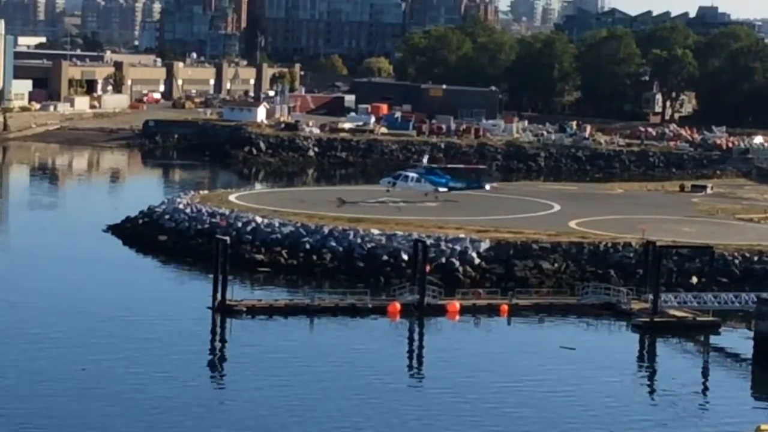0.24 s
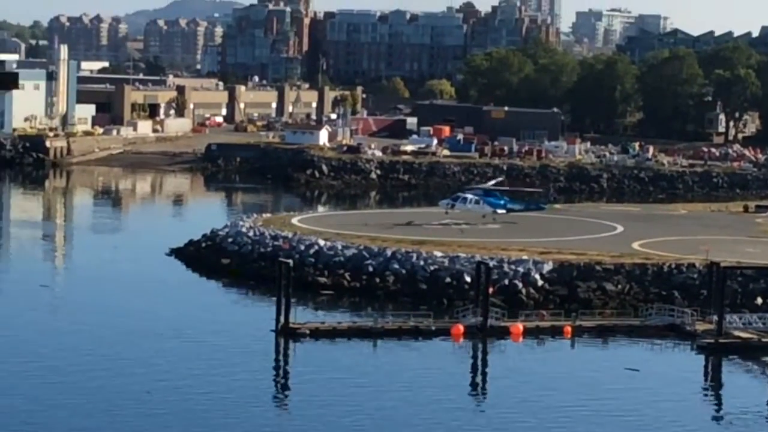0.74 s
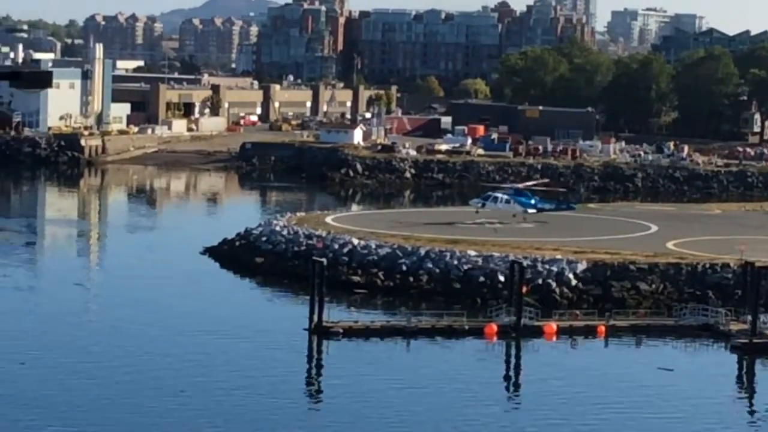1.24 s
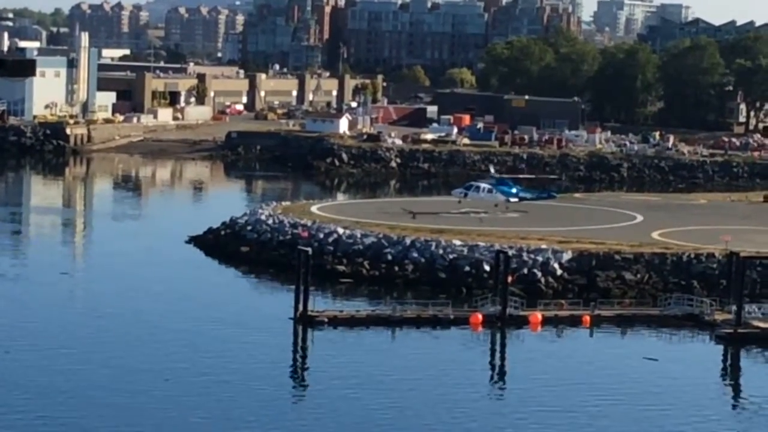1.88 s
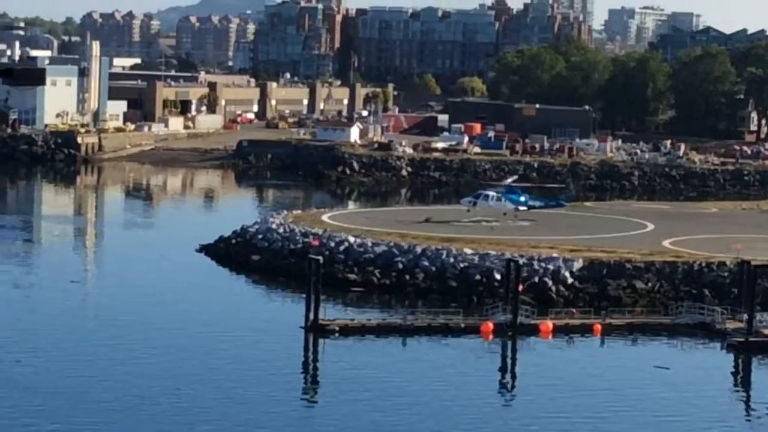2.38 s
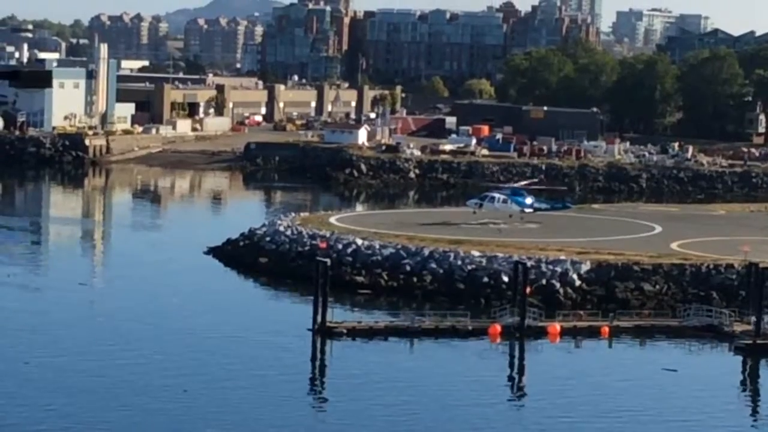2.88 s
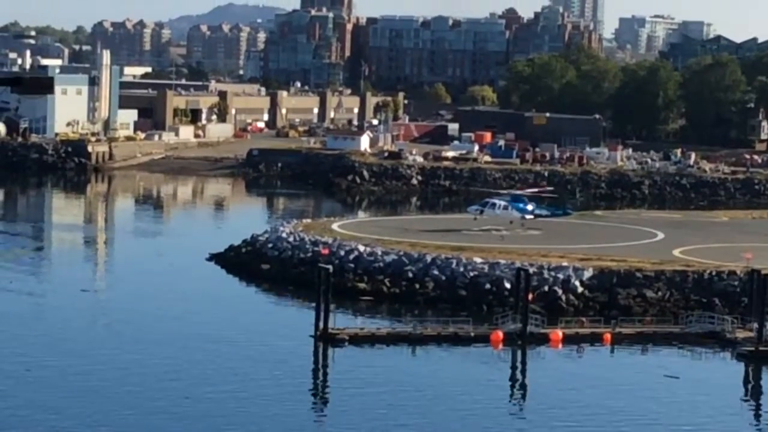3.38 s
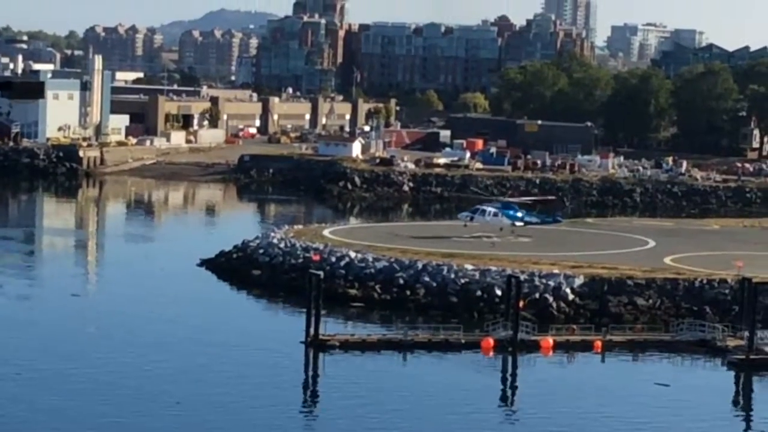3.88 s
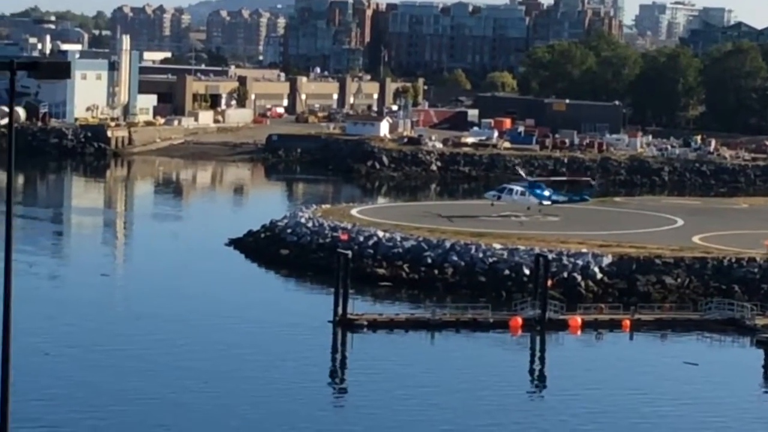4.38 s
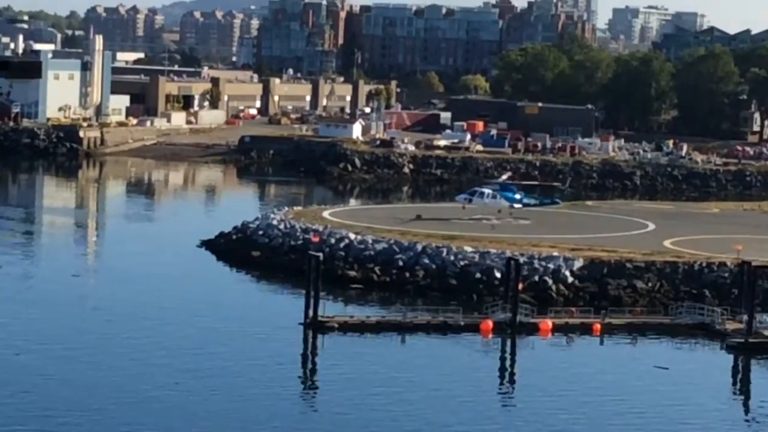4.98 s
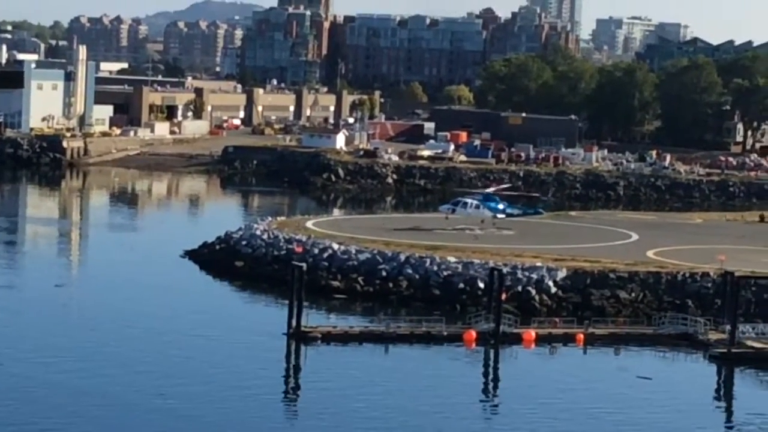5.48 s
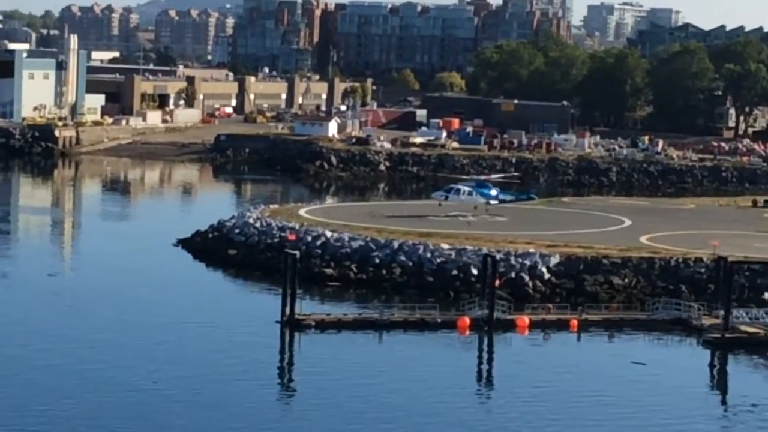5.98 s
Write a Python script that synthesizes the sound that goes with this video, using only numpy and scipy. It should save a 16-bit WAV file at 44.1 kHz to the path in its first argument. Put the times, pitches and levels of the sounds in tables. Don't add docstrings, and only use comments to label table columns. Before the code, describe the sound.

Across open water, a waiting helicopter drones steadily: a deep two-note hum, muffled rushing roar, and uneven rapid chopping that slowly recedes.

```python
import sys
import numpy as np
from scipy import signal
from scipy.fft import rfft, irfft
from scipy.io import wavfile
from scipy.ndimage import uniform_filter1d

SR = 44100
rng = np.random.default_rng(int(sys.argv[2]) if len(sys.argv) > 2 else 0)


def field_ratio(decibels):
    return 10 ** (np.asarray(decibels, dtype=float) / 20)


def wav_record(signal):
    frames = np.transpose(np.atleast_2d(signal))
    bounded = np.clip(frames, -1, 1)
    quanta = np.round(bounded * 32767).astype(np.int16)
    wavfile.write(sys.argv[1], SR, quanta)


N = 275625
T = np.arange(N) / SR
ROTOR_HZ = 4.898
TAIL_GEAR = 22


def rms_one(x):
    return x / np.sqrt(np.mean(x ** 2) + 1e-20)


def curve(rows):
    seconds, values = np.transpose(rows)
    return np.interp(T, seconds, values)


def coloured(x, spectrum):
    hz, level_db = np.transpose(spectrum)
    bin_hz = np.maximum(np.arange(N // 2 + 1) * SR / N, 1)
    gain_db = np.interp(np.log(bin_hz), np.log(hz), level_db)
    return irfft(rfft(x) * field_ratio(gain_db), N)


def drift(rate):
    step, settle = 40, 2000
    pole = np.exp(-2 * step * np.pi * rate / SR)
    noise = rng.standard_normal(N // step + settle + 2)
    slow = signal.lfilter([1], [1, -2 * pole, pole * pole], noise)[settle:]
    return np.interp(np.arange(N) / step, np.arange(len(slow)), rms_one(slow))


def bell(x, hz, width_hz, gain_db):
    w, a = 2 * np.pi * hz / SR, field_ratio(gain_db / 2)
    k = np.sin(w) * width_hz / hz / 2
    above = [1 + k * a, -2 * np.cos(w), 1 - k * a]
    below = [1 + k / a, -2 * np.cos(w), 1 - k / a]
    return signal.lfilter(above, below, x)


def swells_db(rows, floor_db, order):
    level = field_ratio(floor_db)
    for s, level_db, half_s in rows:
        level = level + field_ratio(level_db) * np.exp(-np.abs((T - s) / half_s) ** order)
    return 20 * np.log10(level)


def tail_rotor():
    # time in seconds, level in dB.
    hum_level = [(0, -38), (.06, -35.5), (.5, -36.5), (.85, -41.5), (1.4, -39.5), (2.0, -38.5),
                 (2.9, -41.5), (3.9, -41), (4.45, -41), (4.8, -43), (5.45, -42), (5.7, -46.5),
                 (6.05, -42.5), (6.25, -44.5)]
    # centre in seconds, level in dB, half length in seconds.
    upper_swells = [(0.25, -32, 0.18), (0.58, -38, 0.11), (0.77, -36, 0.044), (0.94, -39, 0.047),
                    (1.45, -40, 0.17), (1.73, -41.5, 0.058), (1.93, -42, 0.055), (2.17, -41, 0.081),
                    (2.29, -45.5, 0.036), (2.65, -38.0, 0.17), (2.94, -46.0, 0.044), (3.14, -41, 0.2),
                    (3.56, -39.5, 0.189), (3.98, -35.5, 0.094), (4.27, -38, 0.16), (4.65, -42, 0.16),
                    (4.9, -39.5, 0.097), (5.1, -40, 0.044), (5.26, -38.5, 0.096), (5.61, -47.5, 0.087),
                    (5.77, -39.5, 0.07), (6.01, -50, 0.067), (6.22, -44.5, 0.086)]
    first_db = curve(hum_level)
    second_db = swells_db(upper_swells, floor_db=-54.5, order=3)
    turn = 2 * np.pi * ROTOR_HZ * TAIL_GEAR * T
    sway = turn + 0.093 * drift(2.2)

    beat_peak = .423
    beat_phase = sway + 2 * np.pi * (ROTOR_HZ * T - beat_peak)
    first = np.cos(sway) + field_ratio(-15 + 1.5 * drift(.8)) * np.cos(beat_phase)

    sharp_hz = .14 * (second_db - uniform_filter1d(second_db, size=SR // 2))
    lead = signal.lfilter([2 * np.pi / SR], [1, -np.exp(-3 / SR)], sharp_hz)
    second = np.cos(2 * turn - .5 + lead + .3 * drift(1.2))
    return -np.sqrt(2) * (field_ratio(first_db) * first + field_ratio(second_db) * second)


def main_rotor_tones():
    # multiple of the rotor turn, level in dB.
    main_orders = [(32, -70), (48, -57), (56, -61)]
    tones = 0
    for order, level_db in main_orders:
        fade = field_ratio(level_db + 2.2 * drift(1.3))
        tones = tones + fade * np.sin(2 * np.pi * ROTOR_HZ * order * T + drift(0.9))
    return tones


def blade_lift_db():
    # part of a turn, lift in dB.
    blades = [(.04, 2.4), (.28, 1.9), (.57, 4.8), (.78, 3.0)]
    # time in seconds, lift in dB, decay in seconds.
    slaps = [(0.095, 0.5, .02), (.308, 2, .02), (.479, 1.5, .02), (0.574, 0.5, 0.022), (1.126, 5, 0.017),
             (1.211, 3, 0.048), (1.546, 5, 0.036), (2.055, 2.5, .015), (2.179, 2, 0.035), (2.356, 8, 0.027),
             (2.388, 3, 0.011), (2.53, 4.5, 0.022), (2.756, 1, .02), (2.856, 7.5, 0.019),
             (3.17, 3.5, 0.035), (3.261, 1, .02), (3.386, 3.5, .03), (3.575, 1, .04), (3.789, 3, .03),
             (4.391, 5, 0.08), (4.59, 5, .02), (4.751, 8, .015), (4.797, 6, .015), (4.85, 6.5, 0.017),
             (5.202, 3, 0.017), (5.421, 5.5, 0.042), (5.639, 5.5, 0.012), (5.832, 3, 0.013)]
    pass_width = .054
    lift = 0
    for part, lift_db in blades:
        away = (ROTOR_HZ * T - part + .5) % 1 - .5
        lift = lift + lift_db * np.exp(-.5 * (away / pass_width) ** 2)
    slap_lift = 0
    for s, lift_db, decay_s in slaps:
        onset = np.clip((T - s) / 0.0023 + 1, 0, 1)
        slap_lift = slap_lift + lift_db * onset * np.exp(-np.abs(T - s) / decay_s)
    unevenness = np.clip(.9 + .2 * drift(2.5), 0, 3)
    return (lift - lift.mean()) * unevenness + slap_lift


def hollow_levels_db():
    # centre in seconds, level in dB, half length in seconds.
    low_swells = [(0.077, -49.5, 0.053), (0.313, -45, 0.17), (0.782, -50, 0.1), (1.351, -52.5, 0.026),
                  (1.514, -53.5, 0.064), (1.911, -52.5, 0.28), (2.19, -48.5, 0.065), (2.525, -52, 0.26),
                  (2.885, -55.0, 0.14), (3.291, -53, 0.083), (3.703, -61.5, 0.026), (4.097, -54.5, 0.185),
                  (4.833, -42.5, 0.049), (5.101, -52, 0.16), (5.455, -52, 0.039), (5.774, -61.0, 0.24)]
    high_swells = [(0.12, -51, 0.099), (0.36, -56.5, 0.059), (1.169, -65, 0.199), (2.04, -61.5, 0.158),
                   (2.41, -65.5, 0.19), (2.64, -54.5, 0.025), (2.77, -49.5, 0.178), (3.19, -52.5, 0.029),
                   (3.41, -59, 0.17), (3.76, -76.5, 0.3), (4.43, -56.5, 0.083), (4.6, -54, 0.095),
                   (4.94, -57.5, 0.11), (5.27, -51.5, 0.06), (5.65, -52, 0.026), (5.83, -54.5, 0.086),
                   (6.05, -59, 0.07)]
    floors_db = [-58.5, -61.5]
    return [swells_db(rows, floor_db, order=2)
            for rows, floor_db in zip([low_swells, high_swells], floors_db)]


def roar_levels_db():
    # time in seconds, level in dB about the mean.
    carry = [(0, 5), (.35, 6), (.75, -.5), (1.1, -.5), (1.45, -1.5), (2.05, 0.5), (2.3, 1), (2.55, .5),
             (2.95, 1), (3.15, 0), (3.45, 2), (3.8, 1.5), (4.2, -2), (4.45, -1), (4.75, -2.5), (5.25, -2),
             (5.7, -2), (6.25, -1.5)]
    roar_db = [-46.5, -48.5, -55.5, -69]
    carry_share = [.3, 0.72, 0.86, 0.53]
    note_share = [0.29, 0.16]
    carry_db = curve(carry)
    levels_db = [level_db + share * carry_db for level_db, share in zip(roar_db, carry_share)]
    spread = int(.25 * SR)
    for k, note_db in enumerate(hollow_levels_db()):
        swell_db = uniform_filter1d(note_db - note_db.mean(), spread)
        levels_db[k] = levels_db[k] + note_share[k] * swell_db
    return levels_db


def roar(patchy_db):
    # frequency in Hz, level in dB per Hz.
    roar_colour = [(20, -26.5), (45, -7.5), (150, 2.5), (340, 4.5), (600, -2), (900, -6.5), (1300, -15),
                   (2000, -16), (2450, -16.5), (2900, -29.5), (3700, -34.5), (4400, -32.5), (6400, -50.5),
                   (12000, -71.5)]
    # frequency in Hz, width in Hz, gain in dB.
    echo_dips = [(138, 34, -9), (177, 22, -6), (262.6, 12, -13), (298, 20, -13.5), (344, 27, -4),
                 (366, 31, -7.5), (378.6, 11, -5), (392, 15, -17), (412.5, 12, -7.5), (460.5, 35.6, -13),
                 (500.6, 4.1, 8), (517, 29, -12.5), (569, 40, -4.5), (628, 50, -11.5), (696, 5.6, 1),
                 (729, 54, -4.5), (779.4, 9.8, -11.5), (840.5, 30, -10), (958, 39, -9.5), (965, 26, -0.5),
                 (1049, 32, -10), (1128, 25, -8), (1159, 7.7, -8), (1239, 56, -4.5), (1330, 23, 2),
                 (1413, 26, -5), (1628, 50, -5)]
    # delay in seconds, strength as a signed ratio.
    late_echoes = [(.0088, .13), (.0121, .12), (.0151, .12), (.0247, -.12), (.031, .1)]
    run_in = SR // 5
    source = [np.pad(coloured(noise, roar_colour), (run_in, 0), "wrap")
              for noise in rng.standard_normal((2, N))]

    grain_db = 1.3 * drift(90) + .7 * np.cos(2 * np.pi * ROTOR_HZ * TAIL_GEAR * T)
    common_db = blade_lift_db() + 0.44 * drift(7.0) + grain_db

    groups = np.zeros((5, N))
    swish_shares = [0.21, 0.31, 0.75, 0.74, 0.35]
    edges = 15 * 2 ** np.arange(0, 10.2, 1 / 3)
    for k, (low, high) in enumerate(zip(edges, edges[1:])):
        group = np.searchsorted([230, 470, 1200, 2800], low)
        sos = signal.butter(2, [low, high], "band", fs=SR, output="sos")
        band = signal.sosfilt(sos, source[k % 2])[run_in:]
        flicker_db = swish_shares[group] * common_db + patchy_db * drift(6.0)
        groups[group] += band * field_ratio(flicker_db)

    for hz, width_hz, gain_db in echo_dips:
        groups = bell(groups, hz, width_hz, gain_db)
    bright = groups[3:].copy()
    for delay_s, strength in late_echoes:
        groups[3:] += strength * np.roll(bright, round(delay_s * SR), axis=1)

    levels_db = roar_levels_db()
    rush_db = levels_db[1]
    rumble_db = -48 + 0.44 * (rush_db - rush_db.mean())
    return sum(field_ratio(level_db) * rms_one(g) for level_db, g in zip([rumble_db] + levels_db, groups))


def hollow_notes():
    # frequency in Hz, width in Hz.
    resonances = [(336, 24.8), (571, 33.3)]
    out = 0
    for (hz, width_hz), level_db in zip(resonances, hollow_levels_db()):
        sos = signal.butter(2, [hz - width_hz / 2, hz + width_hz / 2], "band", fs=SR, output="sos")
        note = rms_one(signal.sosfilt(sos, rng.standard_normal(N)))
        note = note / np.sqrt(uniform_filter1d(note ** 2, size=SR // 12) + 0.074)
        out = out + field_ratio(level_db + 0.5) * rms_one(note)
    return out


def microphone_hiss():
    # frequency in Hz, level in dB per Hz.
    hiss_colour = [(2000, 3.5), (6500, -2), (8000, -1), (10000, -4), (13000, -6.5), (15300, -10)]
    return field_ratio(-80.5) * rms_one(coloured(rng.standard_normal(N), hiss_colour))


def scene():
    mix = tail_rotor() + main_rotor_tones() + field_ratio(-1.0) * roar(patchy_db=1.5) + hollow_notes()
    return mix[None]


def top_cut(x):
    return signal.sosfilt(signal.butter(12, 15270, fs=SR, output="sos"), x)


def record(dry):
    return top_cut(dry + microphone_hiss())


dry = scene()
out = record(dry)
wav_record(out)
```